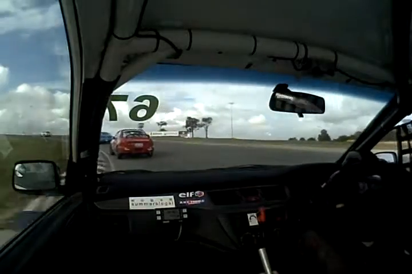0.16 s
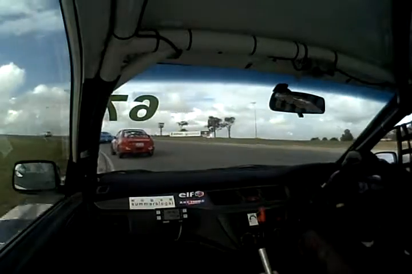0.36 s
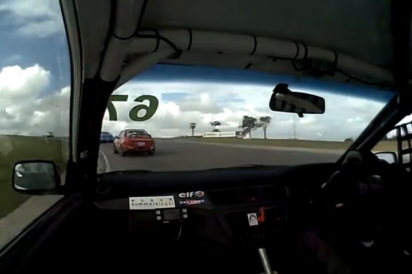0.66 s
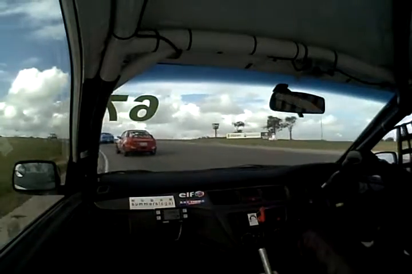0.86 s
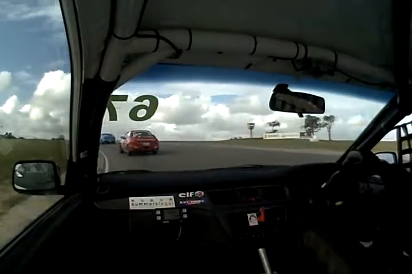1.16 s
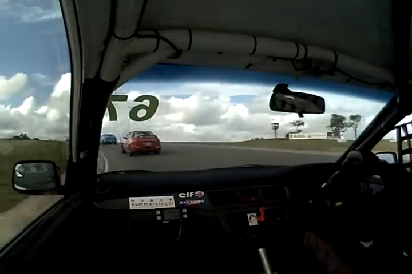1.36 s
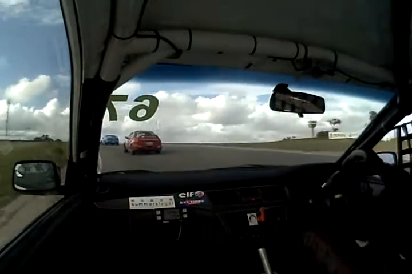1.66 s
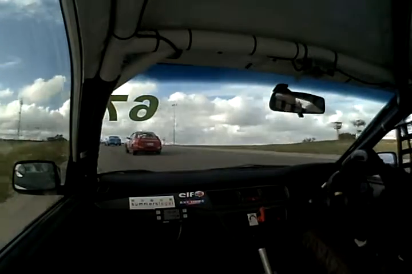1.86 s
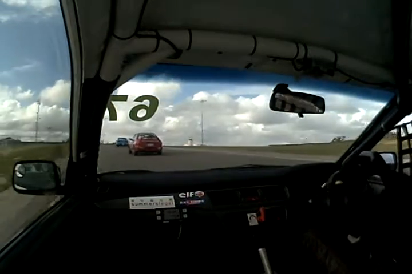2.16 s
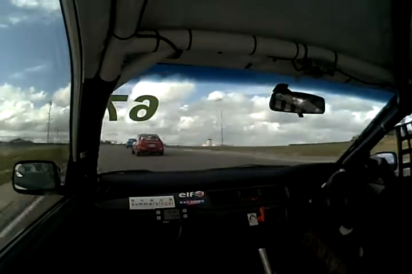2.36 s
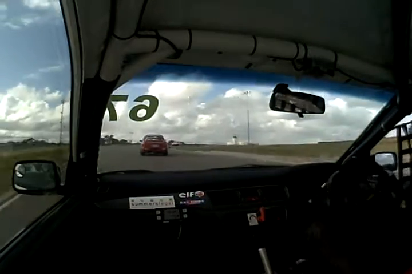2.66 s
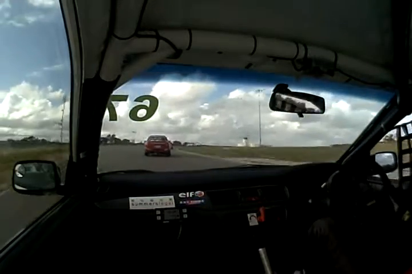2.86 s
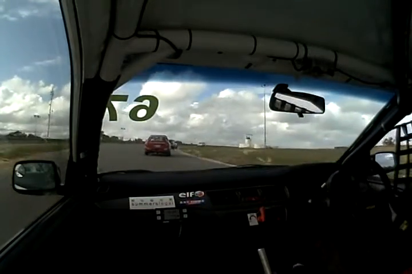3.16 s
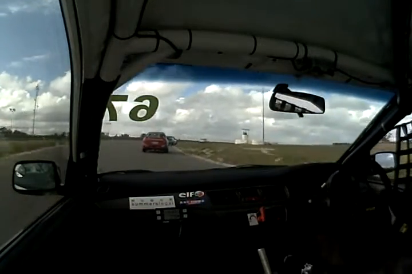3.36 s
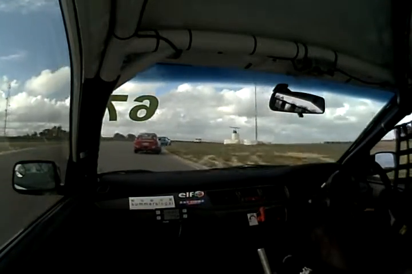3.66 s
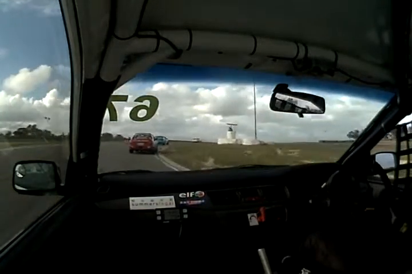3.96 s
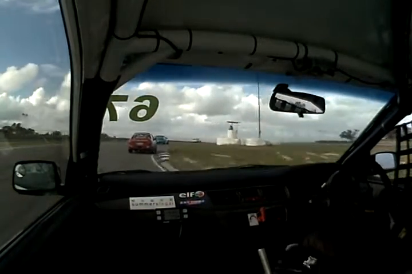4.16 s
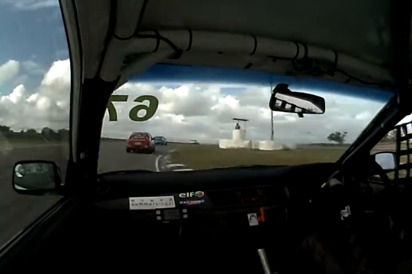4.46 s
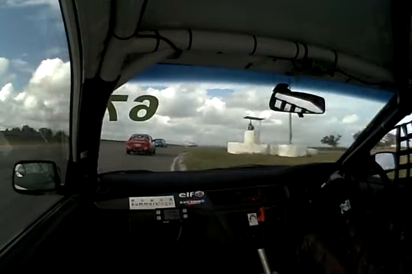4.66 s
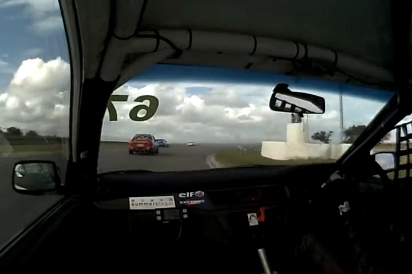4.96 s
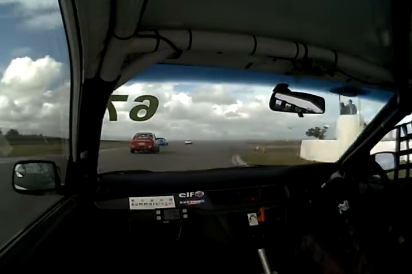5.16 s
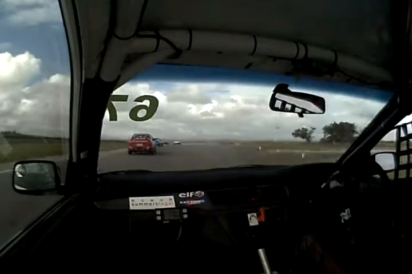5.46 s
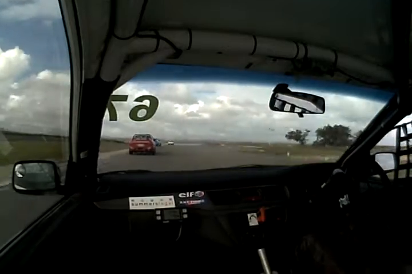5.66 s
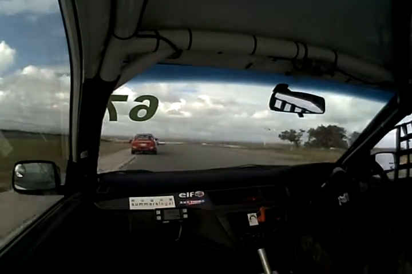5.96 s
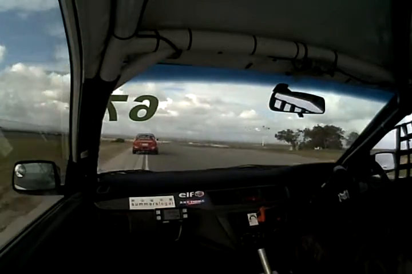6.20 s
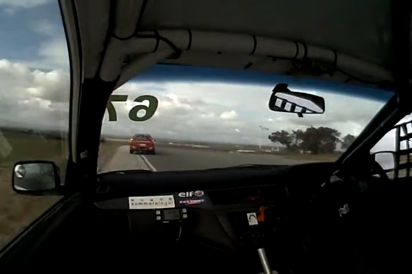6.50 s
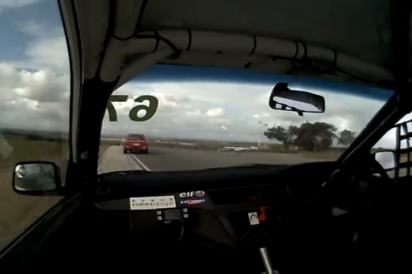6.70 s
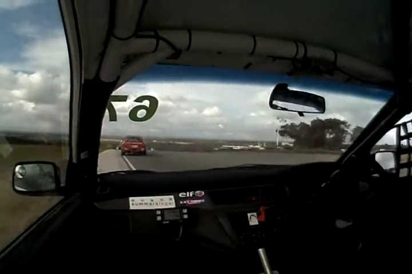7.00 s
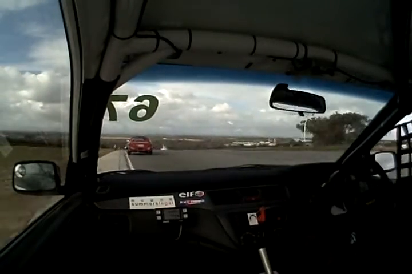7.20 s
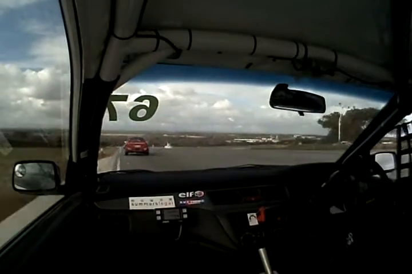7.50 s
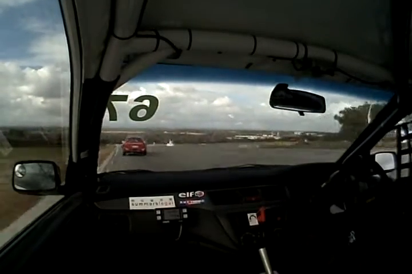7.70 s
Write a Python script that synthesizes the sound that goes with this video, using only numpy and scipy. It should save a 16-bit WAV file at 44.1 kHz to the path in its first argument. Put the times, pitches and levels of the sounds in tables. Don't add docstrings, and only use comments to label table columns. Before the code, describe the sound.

Close, rough sound inside a stripped race car on a track. From 0 s a turbocharged four-cylinder drones low and buzzy, climbing steadily over dull road and wind roar, with faint whines from panels. The roar swells from about 0.9 s, until a hard wind shove near 1.44 s makes the sound drop out for an instant. The engine keeps rising, dulls briefly around 2.8 s, then shifts at 3.2-3.6 s: a short cut and blip, hissing valve chirps, small metallic knocks. It resumes at a lower pitch and climbs again through fluttering gusts, low buffeting, ticks and loose trim rattles. At 6.3 s the tyres mount a ribbed kerb: rapid drumming at about thirty-four thumps a second, floor ringing and clattering slams, heaviest near 6.9-7.1 s, fading by 7.4 s. Engine drone and wind continue, with a last heavy air thump at 7.84 s.

```python
import sys
import numpy as np
from scipy import signal
from scipy.fft import rfft, irfft, next_fast_len
from scipy.io import wavfile
from scipy.ndimage import uniform_filter1d

SR = 44100
rng = np.random.default_rng(int(sys.argv[2]) if len(sys.argv) > 2 else 0)


def rack_gain(trim_db):
    fader = np.asarray(trim_db, float)
    return 10 ** (fader / 20)


def digitize_waveform(pressure):
    field = np.atleast_2d(pressure).T
    bounded = np.clip(field, -1, 1)
    quanta = np.round(bounded * 32767).astype(np.int16)
    wavfile.write(sys.argv[1], SR, quanta)


N = 345744
T = np.arange(N) / SR


def evened(x):
    return x / np.sqrt(np.mean(x ** 2) + 1e-20)


def curves(rows, t=T):
    s, *columns = np.transpose(rows)
    return [np.interp(t, s, c) for c in columns]


def read(points, hz):
    f, value = np.transpose(points)
    return np.interp(np.log(hz + 0.18), np.log(f), value)


def bumps(rows, rise_s, fall_s, t=T):
    coarse = T[::32]
    total = 0
    for s, height in rows:
        width_s = np.where(coarse < s, rise_s, fall_s)
        total = total + height * np.exp(-((coarse - s) / width_s) ** 2)
    return np.interp(t, coarse, total)


def drift(top_hz):
    spectrum = rfft(rng.standard_normal(4096))
    hz = np.fft.rfftfreq(4096, N / SR / 4096)
    slow = irfft(spectrum / (1 + (hz / top_hz) ** 4))
    return np.interp(T, np.linspace(0, N / SR, 4096), evened(slow))


def whistle(hz, width_hz):
    pole = np.exp(-np.pi * width_hz / SR)
    noise = rng.standard_normal(len(hz)) + 1j * rng.standard_normal(len(hz))
    narrow = signal.lfilter([1], np.convolve([1, -pole], [1, -pole]), noise)
    return evened((narrow * np.exp(2j * np.pi * np.cumsum(hz) / SR)).real)


def tone(turns, wobble):
    phase = 2 * np.pi * (turns + rng.random()) + wobble * drift(6)
    return np.sqrt(2) * (1 + wobble * drift(11)) * np.cos(phase)


# time in seconds, pressure level in dB.
BUFFET = [(0.0, -22), (1.3, -22), (1.42, -25.5), (1.56, -20.5), (2.28, -17.5), (2.58, -11.5), (2.76, -24.5),
          (3.0, -13), (3.55, -13), (4.06, -17), (4.23, -13.5), (5.2, -15), (6.3, -12.5), (6.5, -19),
          (6.95, -29.5), (7.13, -11.5), (7.7, -19.5), (7.84, -13)]
# frequency in Hz, level in dB.
BUFFET_COLOUR = [(1, -30), (2.5, -7), (6, 0), (10, -5), (17, -7), (22, -15), (30, -33), (60, -60),
                 (300, -200)]
# peak time in seconds, level in dB over the flutter.
THUDS = [(1.2, 22.5), (1.36, 23.5), (1.82, 15), (2.41, 8.5), (2.75, 8.5), (3.1, -2), (3.49, 23.5),
         (3.93, 10), (4.51, 18.5), (4.88, 8.5), (5.36, 0), (5.75, 11), (5.95, 5), (.95, 14), (2.65, 10.5),
         (6.22, 11.5), (7.3, 19.5)]
# peak time in seconds, pressure in full-scale units.
SHOVES = [
    (0, .06),
    (1.438, -.5),
    (1.475, .38),
    (7.838, .62),
]
SHOVE_S = .018
SNAP = .35
FLUTTER_DB, THUD_RISE_S, THUD_FALL_S = -43, 0.099, 0.073


def buffet():
    size = next_fast_len(N)
    colour = rack_gain(read(BUFFET_COLOUR, np.fft.rfftfreq(size, 1 / SR)))
    noise = evened(irfft(rfft(rng.standard_normal(size)) * colour, size))
    heave = signal.hilbert(noise)[:N]
    heave = heave * np.exp(-1j * SNAP * np.cos(np.angle(heave)))
    heave = evened(heave.real / (uniform_filter1d(abs(heave), 2500) + .15) ** .7)
    off_kerb = np.clip(np.maximum(6.35 - T, T - 7.25) / .1, .1, 1)
    flutter_level = rack_gain(FLUTTER_DB + bumps(THUDS, THUD_RISE_S, THUD_FALL_S)) * off_kerb
    flutter = flutter_level * whistle(40 + 0 * T, 24)
    return rack_gain(curves(BUFFET)[0] + 1) * heave + flutter + bumps(SHOVES, SHOVE_S, SHOVE_S)


def wind_db(t=T):
    calm_db = -13.5
    return np.interp(t, T, uniform_filter1d(curves(BUFFET)[0], size=30000)) - calm_db


# time in seconds, firing rate in Hz, load in dB.
CRANK = [(0.0, 136.9, 1.5), (0.5, 139.4, -4), (1.0, 144.7, -1), (1.445, 150.8, -2), (2.2, 158.9, -2.5),
         (3.19, 165.7, -0.5), (3.225, 150.8, 0.5), (3.3, 146.5, 0), (3.36, 130.2, 1.5), (3.4, 138.1, -23),
         (3.45, 148.7, 0), (3.5, 152.8, 2), (3.64, 116.4, -1.5), (3.85, 118.5, 0.5), (5.25, 126.3, 1),
         (5.85, 131.8, 1), (6.5, 134.3, -6.5), (7.84, 140.8, 2.5)]
# time in seconds, extra firing rate in Hz.
SPIN = [
    (4.56, 0),
    (4.66, 4.5),
    (4.83, 5),
    (4.89, -1),
    (5.1, 0),
]
# time in seconds, level in dB.
ROAR = [(0.0, -47), (0.89, -46), (1.0, -40.5), (1.17, -37), (1.21, -34.5), (1.41, -33), (1.45, -41),
        (2.34, -41), (2.99, -49), (3.8, -48.5), (4.7, -46.5), (5.2, -48), (6.0, -45), (6.25, -47),
        (6.6, -36), (6.92, -33.5), (7.06, -37), (7.2, -47.5)]
# frequency in Hz, level in dB over the roar.
BOOM = [(116, -8.5), (121, 3.5), (131, 2), (138, 6.5), (146, 14), (156, 13), (165, 15)]
SECOND = [(230, 7), (239, 10.5), (247, 5.5), (253, 4.5), (266, -8), (290, -5.5), (318, -0.5), (331, 5)]
THIRD = [(350, -5), (364, -11.5), (378, -2.5), (396, -7), (425, -19), (450, -4.5), (480, -1.5), (497, -1.5)]
FOURTH = [(470, -7), (505, -10.5), (530, -11.5), (565, -9), (590, -3), (612, -9.5), (660, -14)]
# multiple of firing rate, then level in dB over the roar at
ORDERS_DB = [(.5, -11, -17, -9), (.75, -14, -14, -15), (1.215, 2, -1, -8), (1.5, -4, -6, -8),
             (1.75, -12, -21, -17), (2.44, -4, -11, -16), (3.5, -18, -14, -20), (3.75, -24, -15, -17),
             (4.75, -20, -14, -21), (5, -20, -16, -17), (6, -21, -18, -19), (7, -22, -18, -18),
             (5.25, -22, -18, -26), (2.08, -20, -16, -20), (5.83, -20, -21, -20), (8, -24, -23, -26),
             (7.5, -28, -26, -21), (4.17, -26, -16, -19), (8.5, -28, -24, -23), (9, -28, -26, -23),
             (11.9, -30, -27, -26), (10, -30, -24, -30)]
SHIFT_S = 3.6
LIFT_S, LIFT_HALF_S, LIFT_DB = 2.8, 0.15, -7


def engine():
    hz, load_db = curves(CRANK)
    hz = hz + curves(SPIN)[0]
    turns = np.cumsum(hz) / SR
    roar_db = curves(ROAR)[0]
    shut = np.exp(-((T - LIFT_S) / LIFT_HALF_S) ** 4)
    out = rack_gain(roar_db + load_db + read(BOOM, hz) + 4.3 * shut) * tone(turns, wobble=.14)
    for k, response in ((2, SECOND), (3, THIRD), (4, FOURTH)):
        order_db = roar_db + load_db + read(response, k * hz) + LIFT_DB * shut
        out += rack_gain(order_db) * tone(k * turns, wobble=.13)
    stage_s = [.8, 1.1, SHIFT_S - .1, SHIFT_S, 6.8, 7.3]
    for k, light, boost, top in ORDERS_DB:
        stage_db = np.interp(T, stage_s, [light, boost, boost, top, top, light])
        out += rack_gain(roar_db - 12 * shut + stage_db + .7) * tone(k * turns, wobble=.25)
    return out, turns


# frequency in Hz, density in dB per Hz.
ROAR_COLOUR = [(33, -29.5), (56, -1), (82, -4.5), (136, -7.5), (187, -7), (263, -15.5), (419, -19.5),
               (899, -23.5), (1320, -32), (1700, -31), (3720, -49), (6180, -53), (8140, -57.5), (8860, -66),
               (11500, -99), (19500, -120)]
# peak time in seconds, level in dB over the roar.
GUSTS = [(.23, -0.5), (.33, -0.5), (.56, 0.5), (1.89, 6), (2.12, -0.5), (2.75, 2), (2.99, 3), (3.34, 0),
         (3.379, 2.5), (3.472, 1.5), (3.61, 3), (3.758, 3.5), (3.87, 4.5), (3.905, -1), (4.01, 4),
         (4.09, 3), (4.33, 3.5), (4.39, 4), (4.512, -2), (4.67, 3), (4.77, 3.5), (4.88, 5.5), (4.99, 1.5),
         (5.05, -2.5), (5.12, 0), (5.24, 5), (5.285, 4.5), (5.34, 1), (5.395, 1), (5.6, 2.5), (5.745, 3),
         (5.83, 2), (5.87, -0.5), (5.96, 4.5), (6.015, 1.5), (6.055, 2), (6.14, 10.5), (6.22, 2.5),
         (6.275, 8), (6.35, 4), (6.6, 1.5), (6.87, 4), (6.91, 0), (6.98, 0), (7.14, 1.5), (7.39, -0.5),
         (7.59, -0.5), (7.71, -2.5)]
GUST_RISE_S, GUST_FALL_S, GUST_BRIGHT = 0.007, 0.031, 0.076
RUMBLE_PER_DB, HISS_PER_DB = 0.26, 0.1929
BOOST_FROM_HZ, BOOST_HISS_DB_PER_HZ = 159.2, 0.43
DIP_HZ, DIP_WIDTH_HZ, DIP_DB = 665, 70, -3
COAST_DB = -4.5


def roar(turns):
    frames, hz = N // 128 + 5, np.fft.rfftfreq(512, 1 / SR)
    t = np.arange(frames) * 128 / SR
    real, imag, patches = rng.standard_normal((frames, 257, 3)).T
    patches = evened(uniform_filter1d(uniform_filter1d(patches, 9, 0), 14, 1))
    flurry = evened(uniform_filter1d(rng.standard_normal(frames), 12))
    level_db, wind = curves(ROAR, t)[0], wind_db(t)
    gust_db = bumps(GUSTS, GUST_RISE_S, GUST_FALL_S, t)

    low_db = 2.0 + RUMBLE_PER_DB * wind
    hiss_db = -21 + HISS_PER_DB * (curves(KERB, t)[1] + 55)
    hiss_db += BOOST_HISS_DB_PER_HZ * np.maximum(curves(CRANK, t)[0] - BOOST_FROM_HZ, 0)
    low = np.clip(np.log2(300 / (hz + 1)), 0, 1)
    high = np.clip(np.log2((hz + 1) / 1800), 0, 1)

    colour_db = read(ROAR_COLOUR, hz) + DIP_DB * np.exp(-((hz - DIP_HZ) / DIP_WIDTH_HZ) ** 2)
    middle = (hz > 400) & (hz < 2500)
    colour_db -= 10 * np.log10(np.sum(rack_gain(2 * colour_db[middle])))

    field_db = colour_db[:, None] + level_db
    field_db += np.outer(low, low_db - 6.5) + np.outer(high, hiss_db + 24.0)
    field_db += np.outer(1 + GUST_BRIGHT * high, gust_db)
    field_db += COAST_DB * np.outer((hz > 1150) & (hz < 2200), np.clip((t - 7.3) / .15, 0, 1))
    flurry_db = flurry * (0.77 + 0.25 * np.maximum(wind, 0))
    field_db += 0.67 * patches + np.outer(0.56 + 0.08 * high, flurry_db) - .3
    spectrum = (real + 1j * imag) * rack_gain(field_db)
    sound = signal.istft(spectrum, nperseg=512, noverlap=384)[1][:N]
    return sound * (1 + 0.075 * np.cos(2 * np.pi * turns))


def cabin(x):
    t60_s, reflections_db = .2, -10
    t = T[40:4000]
    tail = rng.standard_normal(len(t)) * rack_gain(-60 * t / t60_s)
    tail = rack_gain(reflections_db) * tail / np.linalg.norm(tail)
    response = np.concatenate([[1], np.zeros(39), tail])
    return signal.oaconvolve(x, response / np.linalg.norm(response))[:N]


# start in seconds, end in seconds, pitch in Hz, width in Hz,
# level in dB over the roar.
WHINES = [(.1, 1.6, 1495, 12, -18), (0, 1.0, 238, 10, -6), (0, .9, 646, 14, -13), (.4, 2.8, 1722, 14, -20),
          (.9, 1.5, 1217, 25, -16), (1.7, 3.0, 234, 9, -2), (3.6, 4.28, 592, 10, -11),
          (5.29, 5.46, 1520, 18, -12), (0, 3.3, 780, 70, -14), (2.05, 2.75, 765, 14, -12),
          (3.4, 7.8, 850, 110, -10), (1.2, 2.6, 1620, 120, -19), (0, .45, 1637, 10, -23),
          (0, .3, 1672, 10, -24), (6.5, 7.0, 1070, 80, -14), (2.6, 2.78, 1925, 15, -21),
          (5.75, 6.12, 1530, 25, -16), (1.6, 2.6, 820, 25, -15), (4.6, 4.88, 517, 10, -9),
          (5.0, 5.47, 868, 12, -14), (1.5, 2.8, 1378, 18, -23), (2.15, 2.5, 1640, 14, -20),
          (7.45, 7.84, 1720, 60, -22), (7.3, 7.5, 1090, 25, -13), (5.84, 5.92, 585, 15, -5),
          (5.95, 6.06, 835, 30, -7), (5.02, 5.12, 1710, 14, -15), (6.2, 6.35, 815, 30, -8),
          (1.58, 1.68, 1090, 20, -12), (1.95, 2.15, 650, 15, -11), (6.86, 6.95, 980, 50, -8)]
SING_WANDER = .003


def whines():
    out, roar_db = np.zeros(N), curves(ROAR)[0]
    for start, end, hz, width, db in WHINES:
        span = slice(max(int((start - .03) * SR), 0), int((end + .03) * SR))
        gate = np.clip(np.minimum(T[span] - start, end - T[span]) / .05 + .5, 0, 1)
        pitch = hz * (1 + SING_WANDER * drift(4)[span])
        out[span] += gate * rack_gain(roar_db[span] + db) * whistle(pitch, width)
    return out


# peak time in seconds, change of level in dB.
LULLS = [(.05, 2), (.11, 0), (.4, -2), (1.57, -3), (1.875, 0), (2.62, -1), (2.88, 1.5), (3.21, 1.5),
         (3.42, -5), (3.56, 0), (3.685, -5), (3.74, -3.5), (3.785, -7), (4.13, -3.5), (4.27, -4.5),
         (4.48, -5.5), (4.93, -7), (5.16, -7.5), (5.22, -2), (5.48, -5), (5.56, -3.5), (5.635, -6.5),
         (5.81, -7), (5.99, -9.5), (6.18, -7.5), (6.24, -5), (6.43, -3.5), (6.76, -0.5), (7.19, -4.5),
         (7.35, -2), (7.46, -6.5), (7.64, -3.5), (7.76, -3), (7.82, -1.5)]
LULL_S = 0.015


def capsule_choke_db():
    pin_s = [1.41, 1.431, 1.435, 1.438, 1.443, 1.446]
    pinned_db = np.interp(T, pin_s, [0, 5, 2, -22, -22, 1]) * (T < 1.45)
    return pinned_db + bumps(LULLS, LULL_S, LULL_S)


def puffs(rows):
    sag_per_s = .8
    out = np.zeros(N)
    for s, length_s, hz, width, db in rows:
        u = np.linspace(0, 1, int(length_s * SR))
        shape = np.minimum(u / .12, 1) * (1 - u ** 3)
        out[int(s * SR):][:len(u)] += rack_gain(db) * shape * whistle(hz * (1 - sag_per_s * length_s * u), width)
    return out


# start in seconds, length in seconds, centre in Hz, level in dB.
RATTLES = [(.466, 0.017, 5030, -62.5), (1.733, 0.016, 4950, -55), (1.891, 0.14, 4430, -60.5),
           (4.675, 0.048, 3550, -60), (4.774, 0.028, 4450, -56), (4.856, 0.0474, 3466, -59.5),
           (5.579, 0.034, 2980, -67.5), (5.68, 0.033, 4200, -60), (6.145, 0.044, 2270, -49.5),
           (6.298, 0.23, 2090, -46), (7.187, 0.09, 3920, -58), (7.121, .04, 6000, -55.5),
           (7.367, 0.028, 4500, -60.5), (3.452, 0.078, 4500, -65.5), (4.37, .035, 4000, -62.5),
           (4.445, .025, 3500, -63), (4.815, .03, 5000, -63), (3.623, .055, 4500, -66.5),
           (7.632, 0.0195, 4940, -57.5)]
RATTLE_WIDTH = 0.79


def loose_trim():
    return puffs([(s, length_s, hz, RATTLE_WIDTH * hz, db) for s, length_s, hz, db in RATTLES])


# time in seconds, signed size in steps,
# number of steps in a row.
STEPS = [(.9575, -.3, 1), (1.0016, -.5, 1), (1.0605, .6, 1), (1.4466, 1, 1), (1.4788, -1, 1),
         (2.515, -1, 2), (2.6135, 1, 1), (2.9729, -1, 1), (3.3774, -1, 3), (3.5804, -1, 1), (4.1931, -1, 1),
         (4.9134, 1, 1), (7.1147, -1, 2), (7.2601, -1, 4)]
STEP_SIZE, STEP_GAP_S, LEAK_S = .025, .0019, .03


def gain_ticks():
    jumps = np.zeros(N)
    for s, direction, count in STEPS:
        times_s = s + STEP_GAP_S * np.arange(count)
        jumps[np.round(times_s * SR).astype(int)] = STEP_SIZE * direction
    return signal.lfilter([1], [1, -np.exp(-1 / (LEAK_S * SR))], jumps)


# start in seconds, length in seconds, pitch in Hz,
# width in Hz, level in dB.
CHIRPS = [(3.22, .062, 6900, 600, -55), (3.266, .02, 5350, 250, -53), (3.28, .05, 5250, 450, -57),
          (3.222, .04, 3500, 500, -59), (3.262, .05, 3200, 500, -60), (3.347, .022, 2800, 380, -49),
          (3.385, .022, 2830, 250, -52), (3.345, .03, 5150, 450, -60), (3.35, .02, 5850, 250, -63),
          (3.385, .025, 5100, 300, -62), (3.24, .03, 5900, 500, -61), (3.222, .02, 5100, 300, -62),
          (3.347, .025, 1700, 250, -54), (3.27, .06, 1800, 300, -56), (3.22, .19, 2200, 2000, -56),
          (3.215, .2, 5500, 4500, -58), (3.53, .07, 285, 15, -44), (6.27, .035, 840, 80, -46),
          (4.77, .025, 4480, 160, -57), (4.68, .022, 3300, 250, -60), (4.372, .03, 3300, 250, -63)]


def boost_valve():
    return puffs(CHIRPS)


def loose_metal():
    body = whistle(450 + 0 * T, 400)
    return body + .5 * whistle(950 + 0 * T, 900) + .16 * whistle(3500 + 0 * T, 5000)


# time in seconds, level in dB.
KNOCKS = [(3.376, -33), (3.468, -32), (3.722, -38), (3.755, -37), (3.989, -33), (4.059, -36), (4.313, -40),
          (4.437, -35), (4.508, -29), (4.571, -35), (4.667, -36.5), (4.998, -34), (5.049, -33.5),
          (5.39, -30.5), (5.61, -31.5), (5.657, -32), (5.824, -32), (6.004, -34.5), (6.279, -30.5)]
# time in seconds, level in dB.
SLAMS = [(6.349, -29.5), (6.435, -28.5), (6.551, -24.5), (6.604, -28.5), (6.675, -31.5), (6.737, -26),
         (6.855, -22), (6.883, -18), (6.915, -19), (6.975, -25.5), (7.019, -21.5), (7.151, -33.5),
         (7.171, -34.5), (7.195, -29.5), (7.309, -44.5), (7.332, -40.5)]
SLAM_DB, SLAM_RISE_S, SLAM_FALL_S = -15.5, .002, 0.013


def knocks_and_slams(rattle):
    blows = [(s + .003, rack_gain(db + SLAM_DB)) for s, db in SLAMS + KNOCKS]
    return bumps(blows, SLAM_RISE_S, SLAM_FALL_S) * rattle


# time in seconds, peak level in dB.
TAPS = [
    (3.377, -40),
    (3.469, -36),
    (3.755, -39),
    (4.509, -41),
    (6.553, -29),
]
# frequency in Hz, level in dB, decay by 60 dB in seconds.
TAP_MODES = [(620, 0, .04), (930, 0, .035), (1450, -6, .025), (2300, -12, .02)]


def taps():
    strikes, t = np.zeros(N), T[:2500]
    ring = sum(rack_gain(db - 60 * t / t60) * np.sin(2 * np.pi * hz * t) for hz, db, t60 in TAP_MODES)
    for s, db in TAPS:
        strikes[int(s * SR)] = rack_gain(db)
    return signal.oaconvolve(strikes, ring)[:N]


# time in seconds, thump level in dB, shake level in dB.
KERB = [
    (6.3, -47.5, -58),
    (6.4, -28, -35.5),
    (6.5, -19, -32.5),
    (6.7, -20.5, -28.5),
    (6.94, -14.5, -27.5),
    (6.99, -13.5, -30.5),
    (7.08, -13, -35),
    (7.18, -25.5, -39.5),
    (7.4, -32.5, -57.5),
]
# multiple of the rib rate, level in dB, time of its swell in seconds.
RIBS = [(2, -5, 6.62), (3, -3, 6.55), (4, -4, 6.85), (5, -4, 6.8), (6, -10, 7.0), (7, -16, 6.63),
        (9, -15, 7.0), (10, -17, 6.6)]
RIBS_PER_S, RATTLE_DB = 34.4, -8.5
RIB_SWELL_DB, RIB_SWELL_S = 5.5, 0.11


def kerb(rattle):
    thump_db, ring_db = curves(KERB)
    turns = RIBS_PER_S * T
    on = (T > KERB[0][0]) & (T < KERB[-1][0])
    phase = 2 * np.pi * turns + .2 * drift(8)
    ring = np.zeros(N)
    for k, db, s in RIBS:
        swell_db = bumps([(s, RIB_SWELL_DB)], RIB_SWELL_S, RIB_SWELL_S)
        ring += rack_gain(db + swell_db) * np.cos(k * phase)
    ring *= 1.4 + .4 * drift(14)
    bursts = evened(np.exp(1.6 * np.cos(2 * np.pi * turns) + .4 * drift(120)))
    shake = rack_gain(ring_db) * (ring + rack_gain(RATTLE_DB) * bursts * rattle)
    return on * (rack_gain(thump_db) * tone(turns, wobble=.3) + shake)


def scene():
    heave = buffet()
    orders, turns = engine()
    rattle = loose_metal()
    fine = orders + cabin(roar(turns)) + whines() + loose_trim() + boost_valve()
    fine += knocks_and_slams(rattle) + taps() + kerb(rattle)
    return (rack_gain(capsule_choke_db()) * fine + heave)[None]


def low_pass(x):
    return signal.sosfilt(signal.butter(12, 8690, fs=SR, output="sos"), x)


def record(dry):
    limit = .64
    squeezed = limit * np.tanh(dry / limit)
    edge = signal.firwin(255, 9000, window=("kaiser", 10), fs=SR)
    wet = signal.oaconvolve(squeezed + gain_ticks(), edge[None], "same")
    return low_pass(wet)


dry = scene()
out = record(dry)
digitize_waveform(out)
```